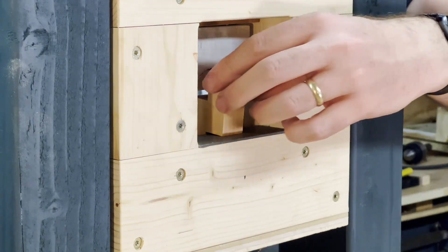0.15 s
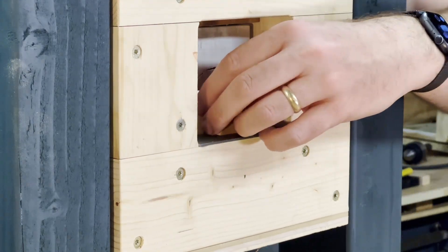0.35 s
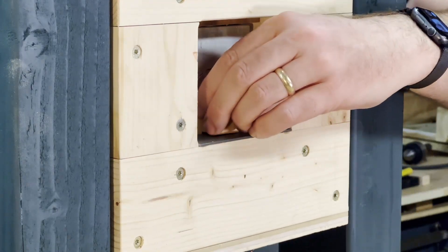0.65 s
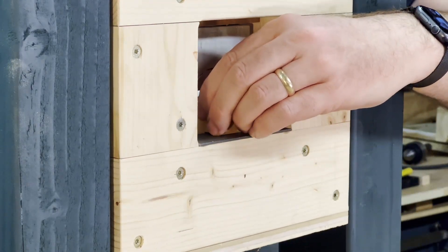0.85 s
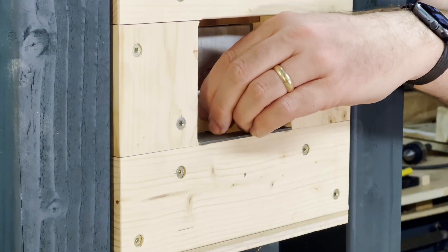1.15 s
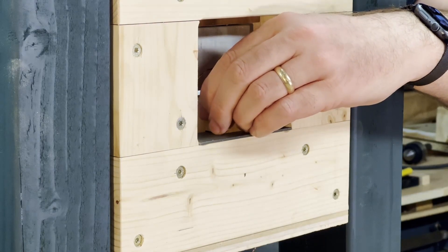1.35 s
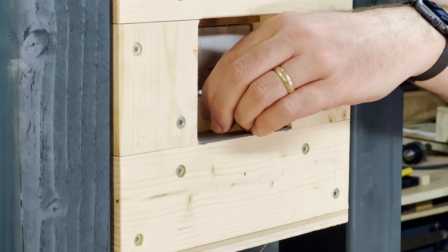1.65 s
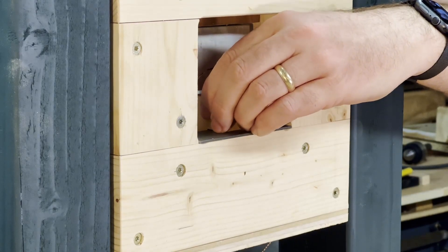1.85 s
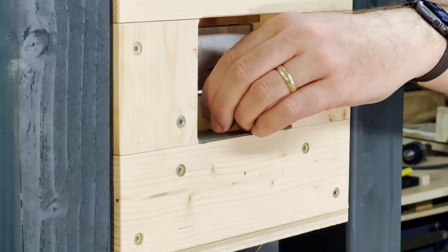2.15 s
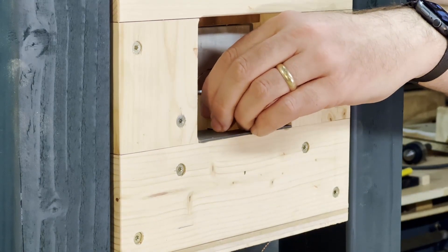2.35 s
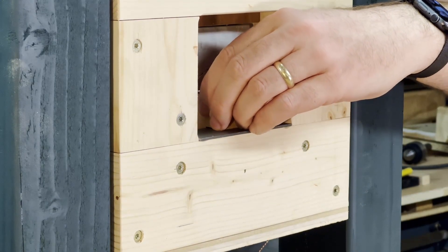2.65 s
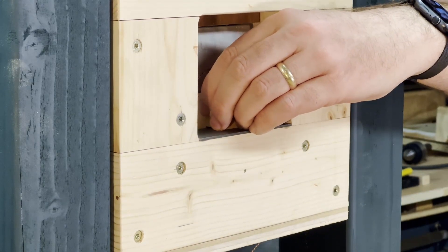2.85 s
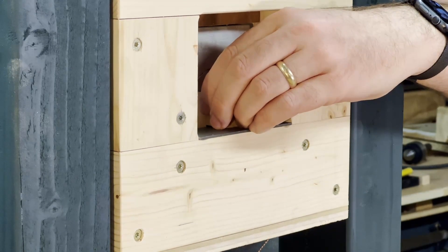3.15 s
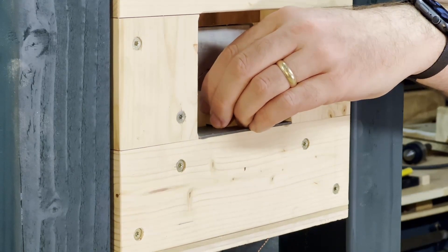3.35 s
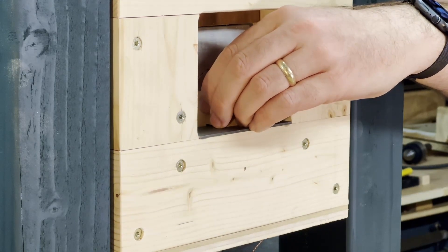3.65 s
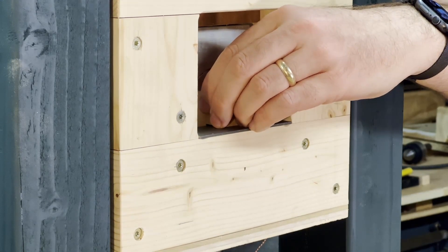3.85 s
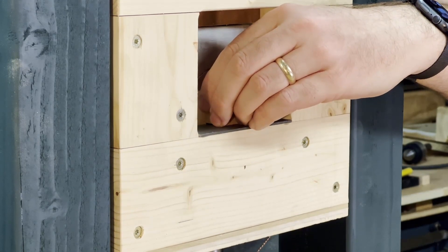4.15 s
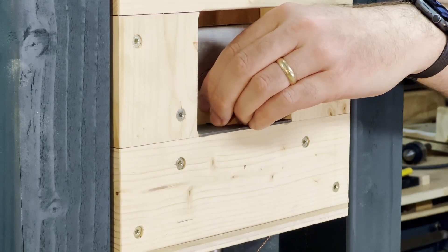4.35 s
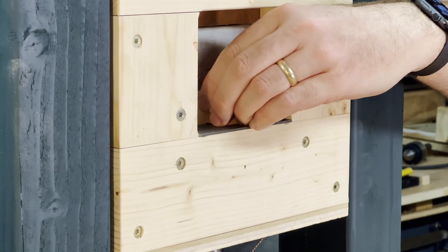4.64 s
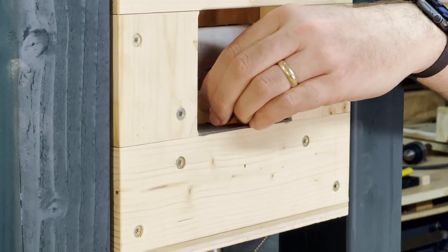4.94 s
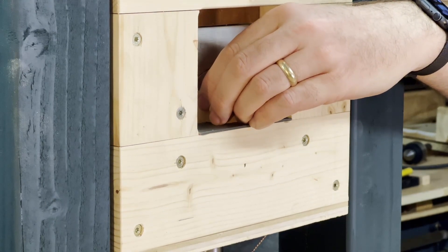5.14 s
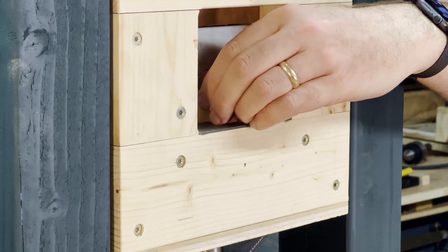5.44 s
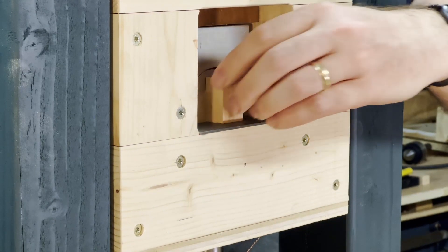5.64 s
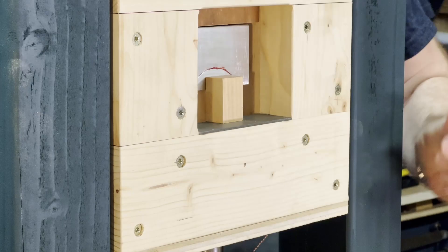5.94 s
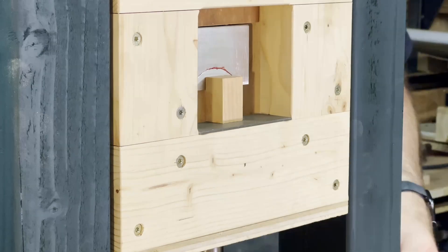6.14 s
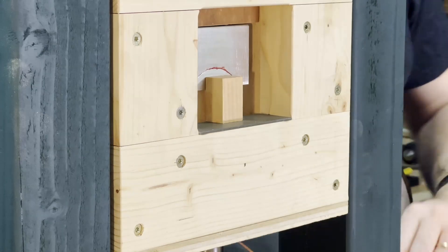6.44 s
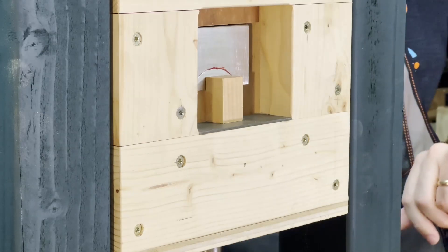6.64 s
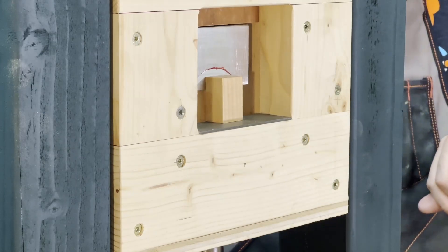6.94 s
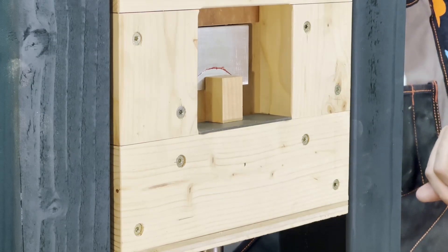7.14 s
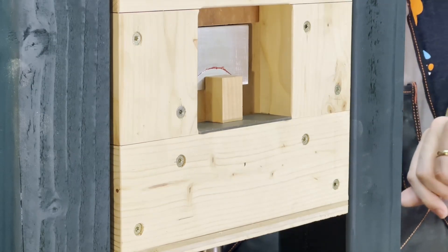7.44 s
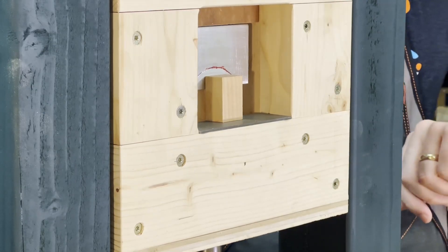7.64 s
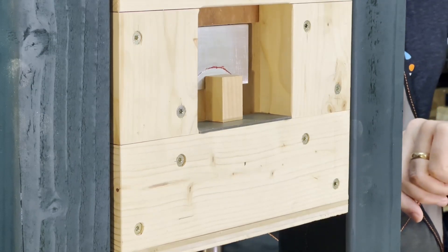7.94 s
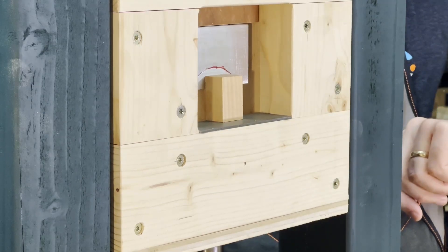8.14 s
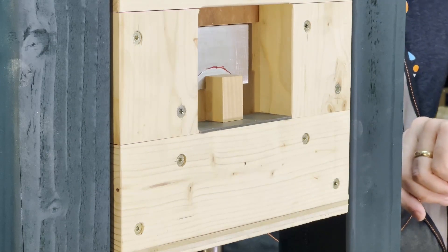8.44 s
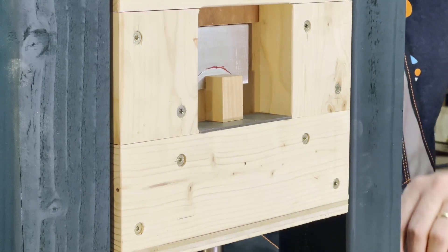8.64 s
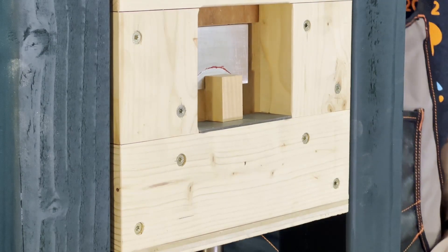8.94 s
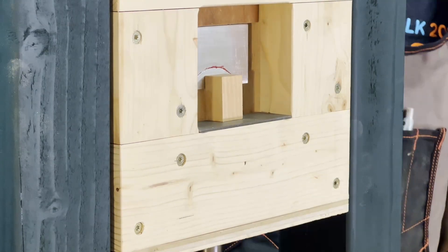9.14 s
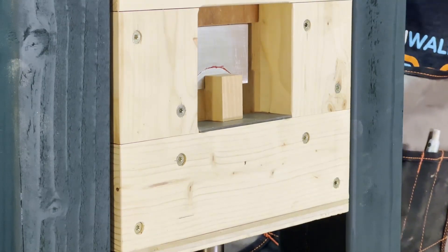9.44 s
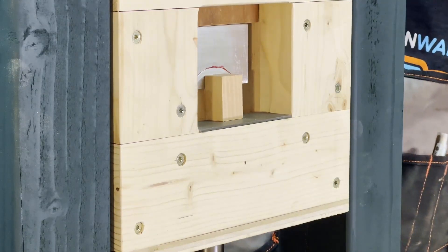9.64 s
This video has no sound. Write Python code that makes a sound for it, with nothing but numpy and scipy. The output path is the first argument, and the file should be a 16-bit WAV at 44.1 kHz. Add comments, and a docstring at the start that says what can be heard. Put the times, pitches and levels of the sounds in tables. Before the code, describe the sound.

A hand-pumped jack in a wooden frame clacks sharply in steady strokes, pauses with a cloth rustle and soft heavy thuds, then clacks once more.

```python
"""A hydraulic jack inside a wooden press frame is pumped by hand in a quiet workshop, heard by a stereo pair.
At each end of a stroke the loose steel linkage clacks and the frame knocks: chattering contacts ring decaying
modes and a broad crack, and the room answers with noise dying in two stages. Light taps fall mostly between.
In the pause cloth rustles (uneven swelling noise) and something heavy thuds (low decaying sines).
Below lies a low room rumble of coloured noise with faint wavering tones."""
import sys
import numpy as np
from scipy import signal
from scipy.fft import rfft, irfft
from scipy.io import wavfile
from scipy.ndimage import uniform_filter1d

SR = 44100
rng = np.random.default_rng(int(sys.argv[2]) if len(sys.argv) > 2 else 0)


def transcribe(signal):
    """Save signal, clipped to [-1, 1], as a 16-bit WAV file at the path in sys.argv[1]."""
    frames = np.atleast_2d(signal).T
    limited = np.clip(frames, -1, 1)
    pcm = np.round(limited * 32767).astype(np.int16)
    wavfile.write(sys.argv[1], SR, pcm)


N = 431738   # length in samples


def amp(db):
    """Level in dB to linear gain."""
    return 10 ** (np.asarray(db) / 20)


def rms_one(x):
    """Scale a signal to rms 1."""
    return x / np.sqrt(np.mean(x ** 2) + 1e-20)


def at_hz(points, hz):
    """Read a (f/Hz, value) table on a log-frequency axis."""
    table_hz, values = np.transpose(points)
    return np.interp(np.log(hz), np.log(table_hz), values)


def bin_hz(size):
    """Frequencies of the spectrum bins in Hz, kept at 1 or above for the logarithms."""
    return np.maximum(np.arange(size // 2 + 1) * SR / size, 1)


def drift(rate_hz):
    """Slow random wander of rms 1: noise through two equal low-pass poles, run at SR / 40."""
    step = 40
    pole = np.exp(-2 * np.pi * rate_hz * step / SR)
    settling = 2000
    noise = rng.standard_normal(N // step + settling + 2)
    slow = signal.lfilter([1], [1, -2 * pole, pole * pole], noise)[settling:]
    return np.interp(np.arange(N) / step, np.arange(len(slow)), rms_one(slow))


def shaped(size, gain_at, likeness):
    """Stereo noise coloured by a gain per frequency; a shared and an opposed part set left-right likeness."""
    hz = bin_hz(size)
    mid, side = rfft(rng.standard_normal((2, size)))
    alike = np.clip(at_hz(likeness, hz), 0, 1)
    pair = np.sqrt(1 + alike) * mid + np.sqrt(1 - alike) * side * [[1], [-1]]
    return irfft(gain_at(hz) * pair, size)


# room noise spectrum before overall scaling: (f/Hz, relative level/dB per Hz)
RUMBLE_COLOUR = [(15, -55.5), (25, -37.5), (48, -3.5), (111, -9.5), (185, -10.5), (293, -16.5),
                 (354, -20.5), (677, -33), (962, -37.5), (1130, -39.5), (14800, -56), (16000, -56.5)]
# how alike the room noise is at left and right: (f/Hz, likeness 0..1)
RUMBLE_LIKENESS = [(60, 0.97), (240, 0.9), (950, 0.55), (3770, 0.26), (15000, 0.4)]
# narrow tones in the room noise: (f/Hz, width at half amplitude/Hz, level before wavering/dB)
FAINT_TONES = [(182.2, 13.2, -64.5), (1450, 73, -86), (1440, 29, -86)]
RUMBLE_DB = -58   # before wavering


def rumble():
    """Distant bed of the place: coloured noise plus narrow noise bands, wavering in level together."""
    noise = shaped(N, lambda hz: amp(at_hz(RUMBLE_COLOUR, hz)), RUMBLE_LIKENESS)
    out = amp(RUMBLE_DB) * rms_one(noise)
    for tone_hz, width_hz, db in FAINT_TONES:
        tone = shaped(N, lambda hz: 1 / (1 + (2 * (hz - tone_hz) / width_hz) ** 2), RUMBLE_LIKENESS)
        out += amp(db) * rms_one(tone)
    return out * amp(2.1 * drift(3))


# cloth and hands moving: (peak t/s, peak level before unevenness/dB, swell for 20 dB/s, fade for 20 dB/s)
RUSTLES = [(0, -61, .01, .45), (0.4, -71, .5, .5), (1.3, -74, 1.0, 1.5), (2.5, -60, .2, .13),
           (6.05, -70, .5, .3), (6.2, -58, .02, .15), (6.28, -54, .12, .09), (6.4, -67, .2, .08),
           (6.62, -72, .3, .6), (7.1, -54.5, .03, .07), (7.175, -44.5, .02, .1), (8.44, -74, .1, .25),
           (9.05, -64.5, .35, .3), (9.45, -74, .4, .4)]
# friction noise spectrum before overall scaling: (f/Hz, relative level/dB per Hz)
RUSTLE_COLOUR = [(200, -23), (500, 3.5), (1000, 0), (2500, -2), (5000, -14.5), (9000, -18), (15000, -47)]
# how alike rustle and reflections are at left and right: (f/Hz, likeness 0..1)
ROOM_LIKENESS = [(200, 0.99), (1000, .7), (2500, 0.83), (8000, 0.92)]
RUSTLE_REST_DB = -82   # steady friction noise under the movements, before unevenness


def rustle():
    """Cloth and hands: friction noise, uneven from moment to moment, swelling and fading with each movement."""
    t = np.arange(N) / SR
    level = amp(RUSTLE_REST_DB)
    for peak_s, db, swell_s, fade_s in RUSTLES:
        away = np.maximum((peak_s - t) / swell_s, (t - peak_s) / fade_s)
        level = level + amp(db - 20 * away)
    noise = rms_one(shaped(N, lambda hz: amp(at_hz(RUSTLE_COLOUR, hz)), ROOM_LIKENESS))
    return level * amp(2.2 * drift(60)) * noise


# dull thuds: (onset t/s, starting level of the decay/dB, f/Hz, t60/s)
THUDS = [(6.279, -33, 139.8, 0.1), (7.049, -40.5, 46, .4), (7.165, -32, 126, 0.14),
         (7.196, -29.5, 45.2, 0.4), (7.298, -34.5, 50.1, 0.57), (7.356, -39, 78, 0.21),
         (7.508, -39.5, 47.4, 0.6)]


def thuds():
    """Soft heavy contacts: one low decaying mode each, swelling over about a cycle."""
    out, t = np.zeros(N + SR), np.arange(SR) / SR
    for onset_s, db, hz, t60 in THUDS:
        decay = amp(db - 60 * t / t60)
        swell = 1 - np.exp(-2 * t * hz)
        at = round(onset_s * SR)
        out[at:at + SR] += decay * swell * np.sin(2 * np.pi * hz * t)
    return out[:N]


# decay of the workshop's reflections, first stage: (f/Hz, t60/s)
ROOM_T60 = [(200, 0.64), (600, 0.26), (1500, 0.24), (4000, 0.18), (10000, 0.13)]
ROOM_DB = -6.5   # energy of the whole tail per channel, against the direct path
LATE_DB, LATE_STRETCH = -22.5, 2.22   # second stage against the first: its start, and times slower


def workshop(x):
    """Reflections: noise building over a few ms and dying in two stages, at its own rate per half octave."""
    t, tail = np.arange(SR) / SR, 0
    for centre_hz in 100 * 2 ** np.arange(0, 7.6, .5):
        band = shaped(len(t), lambda hz: np.exp(-6 * np.log2(hz / centre_hz) ** 2), ROOM_LIKENESS)
        decay_db = -60 * t / at_hz(ROOM_T60, centre_hz)
        tail = tail + band * (amp(decay_db) + amp(LATE_DB + decay_db / LATE_STRETCH))
    tail *= 1 - np.exp(-t / 0.0074)
    tail *= amp(ROOM_DB) / np.sqrt(np.sum(tail ** 2) / 2)
    return signal.fftconvolve(x[None], tail, axes=1)[:, :N]


def blows(events, modes, spread_db, crack_db, crack_hz, octaves):
    """Each contact is a short swelling chatter that rings every mode with a new strength, plus a broad crack."""
    size = 2 ** 14
    out, t = np.zeros(N + size), np.arange(size // 2) / SR
    touch_t = t[:size // 4]
    hz, mode_db, t60 = np.transpose(modes)
    rings = np.sin(2 * np.pi * np.outer(hz, t)) * amp(-60 * t / t60[:, None])
    crack_band = signal.butter(3, crack_hz, "band", fs=SR, output="sos")
    crack = amp(crack_db) * signal.sosfilt(crack_band, t == 0)
    spectrum_hz = bin_hz(size)
    for s, level_db, favoured_hz, emphasis_db, length_s in events:
        mode_chance = rng.standard_normal(len(modes))
        body = amp(mode_db + spread_db * mode_chance) @ rings + crack
        grains = rng.standard_normal(size // 4) ** 3   # a few hard touches among many faint ones
        phase = touch_t / max(length_s, 2e-4)
        settling = amp(-30) * (1 - np.exp(-phase)) * np.exp(-touch_t / .015)   # loose parts settle afterwards
        chatter = grains * (phase ** 2 * np.exp(-2 * phase) + settling)
        # where the part is touched decides which region of its spectrum speaks
        distance = np.log2(spectrum_hz / favoured_hz)
        # a weaker contact is softer and loses the treble above that region
        dulling_db = 0.28 * min(level_db + 19.5, 0) * np.maximum(distance, 0)
        colour = amp(emphasis_db * np.exp(-(distance / octaves) ** 2) + dulling_db)
        lead = 64   # samples of room for the colouring, which starts a little early
        sound = np.roll(irfft(rfft(chatter, size) * rfft(body, size) * colour), lead)
        loudest = np.sqrt(uniform_filter1d(sound ** 2, size=200).max())   # rms over 4.5 ms
        at = round(s * SR) - lead
        out[at:at + size] += amp(level_db) * sound / loudest
    return out[:N]


# event levels below are for the loudest 4.5 ms, before the trim of the frame or linkage as a whole
# lever pushed down: (tick t/s, level/dB, catch t/s, level/dB, stop t/s, level/dB, knock t/s, level/dB,
#                     f the tick favours/Hz, f the knock favours/Hz)
PUSHES = [(0.4698, -42, 0.496, -24, 0.5017, -14, 0.503, -28.5, 2210, 1000),
          (1.0781, -31, 1.0935, -29.5, 1.1015, -9, 1.11, -23, 3880, 990),
          (1.942, -37, 1.9536, -29, 1.9601, -18.5, 1.962, -31, 2870, 700),
          (2.6165, -25, 2.643, -19, 2.6464, -10, 2.647, -24, 3960, 1000),
          (3.3925, -33, 3.4173, -23, 3.4289, -13.5, 3.435, -29, 3910, 800),
          (4.375, -38, 4.3795, -23, 4.3945, -14, 4.402, -32, 2500, 700),
          (5.3847, -48, 5.407, -23, 5.4155, -15.5, 5.424, -22.5, 2950, 1000),
          (8.1064, -24.5, 8.131, -20, 8.146, -23, 8.15, -27, 3970, 990)]
# lever lifted: columns as for the pushes (t/s, level/dB four times, then two f/Hz)
LIFTS = [(0.044, -36, 0.0496, -31, 0.0763, -31, 0.083, -28, 3000, 900),
         (0.7975, -36, 0.806, -27, 0.8268, -27, 0.833, -30.5, 2540, 950),
         (1.405, -33.5, 1.4189, -26, 1.449, -30, 1.454, -28.5, 2700, 980),
         (2.251, -37, 2.2633, -24, 2.2797, -21.5, 2.283, -29.5, 3010, 500),
         (2.9827, -40, 3.005, -25, 3.0328, -25.5, 3.033, -28, 2210, 580),
         (3.778, -42, 3.812, -28, 3.843, -37, 3.844, -31, 2530, 560),
         (4.7167, -40, 4.744, -28, 4.7723, -32, 4.782, -26, 2210, 650),
         (5.706, -48, 5.766, -29, 5.7914, -28, 5.796, -26, 2570, 970),
         (8.586, -43, 8.624, -29, 8.652, -36, 8.653, -29.5, 3310, 700)]
# light taps on the frame as the load shifts, mostly between strokes:
# (t just before the peak/s, level/dB, f the contact favours/Hz)
TAPS = [(0.227, -44.5, 700), (0.334, -45, 1490), (0.35, -40, 1450), (0.96, -47.5, 710), (1.043, -38.5, 920),
        (1.301, -54, 880), (1.381, -39, 910), (1.851, -43.5, 905), (1.924, -42, 6000), (1.964, -31, 3060),
        (2.15, -45, 2200), (2.243, -40, 5700), (2.479, -31, 760), (2.839, -48, 3080), (2.961, -40, 910),
        (3.148, -36, 6900), (3.165, -38, 8900), (3.292, -42.5, 710), (3.449, -12, 8400), (3.607, -51, 1800),
        (4.093, -38, 932), (4.125, -45, 850), (4.399, -29, 2320), (4.413, -30.5, 1270), (4.54, -44.5, 2240),
        (5.398, -37.5, 1980), (5.732, -41, 980), (6.225, -50, 1000), (7.001, -37, 973), (7.033, -51, 936),
        (7.344, -31, 961), (7.928, -35, 1040), (8.163, -27, 2300), (8.6, -42, 1500), (8.668, -32.5, 990),
        (9.457, -62, 1530)]
# wooden frame modes: (f/Hz, mean relative level/dB, t60/s)
FRAME_MODES = [(112, -15, 0.3), (241, -2, .1), (394, -2.5, 0.08), (478.6, -1.5, 0.068), (530.2, 3, 0.061),
               (660, 6, 0.021), (805.5, 0.5, 0.018), (990, 12.5, 0.021), (1361, -6, 0.039),
               (1506, -16.5, .025)]
KNOCK = (5.5, 0.0064)   # emphasis dB, chatter length s
WOOD_TAP = (8, .0045)   # emphasis dB, chatter length s
KNOCK_LEAD_S = .003   # wood contacts start this much before their listed time
PUSH_TICK_IN_FRAME_DB, LIFT_TICK_IN_FRAME_DB = -9, -2.5   # the tick also sounds in the wood
TICK_IN_FRAME_HZ, WOOD_TOP_HZ = 2250, 4500   # taps pitched at the top or above sound in the steel alone


def wooden_frame():
    """Wood around the jack: knocks, ticks and taps ring short modes and a mid-range crack."""
    events = [(s - KNOCK_LEAD_S, db, hz, *WOOD_TAP) for s, db, hz in TAPS if hz < WOOD_TOP_HZ]
    for strokes, tick_db in (PUSHES, PUSH_TICK_IN_FRAME_DB), (LIFTS, LIFT_TICK_IN_FRAME_DB):
        for row in strokes:
            tick, _, _, knock, (_, knock_hz) = np.reshape(row, (-1, 2))
            events.append((tick[0] - KNOCK_LEAD_S, tick[1] + tick_db, TICK_IN_FRAME_HZ, *KNOCK))
            events.append((knock[0] - KNOCK_LEAD_S, knock[1], knock_hz, *KNOCK))
    ringing = blows(events, FRAME_MODES, spread_db=3, crack_db=48.5, crack_hz=[300, 2200], octaves=.5)
    return amp(-1.5) * ringing


# steel linkage modes: (f/Hz, mean relative level/dB, t60/s)
STEEL_MODES = [(2610, -9.5, 0.03104), (3402, -10.5, 0.013), (3710, -10, 0.013), (4191, -9.5, 0.079),
               (5500, -21, 0.017), (6630, -15, 0.19), (6990, -15.5, .1), (7200, -9.5, .05),
               (8188, -5, 0.035), (8540, -1, .045), (8340, 0, 0.05), (9626, -2, 0.021), (12460, -6.5, .04),
               (14800, -15, 0.033)]
# catch, then stop, of a push: (f the contact favours/Hz, emphasis level/dB, chatter length t/s)
PUSH_CONTACTS = [(8100, 11, .0025), (8370, 8, .0027)]
# catch, then stop, of a lift: (f the contact favours/Hz, emphasis level/dB, chatter length t/s)
LIFT_CONTACTS = [(9000, 5, .006), (3100, 5, .0025)]
LOOSE = (16, .0025)   # ticks, jolts and rattle: emphasis dB, chatter length s
JOLT_DB, JOLT_LOWEST_HZ, JOLT_LEAD_S = -13, 2800, .005   # a tap is led by a jolt in the linkage
# loose touches from tick to just past the knock, under the level that climbs from tick to catch
RATTLE_DB, RATTLE_SPREAD_DB, RATTLE_ON_S, RATTLE_HZ = -10.5, 3, .02, 3300


def rattle(tick, catch, knock):
    """Eight loose touches at random times, each favouring a pitch within an octave of the centre."""
    touches = []
    for when, strength, place in rng.random(size=(8, 3)):
        s = tick[0] + when * (knock[0] + RATTLE_ON_S - tick[0])
        climb_db = tick[1] + when * (catch[1] - tick[1])
        db = climb_db + RATTLE_DB + RATTLE_SPREAD_DB * (2 * strength - 1)
        touches.append((s, db, RATTLE_HZ * 2 ** (2 * place - 1), *LOOSE))
    return touches


def steel_linkage():
    """Jack linkage: tick, catch, stop and rattle of each stroke ring bright modes and a broad crack."""
    events = [(s - JOLT_LEAD_S, db + JOLT_DB, max(hz, JOLT_LOWEST_HZ), *LOOSE) for s, db, hz in TAPS]
    for strokes, (catch_kind, stop_kind) in (PUSHES, PUSH_CONTACTS), (LIFTS, LIFT_CONTACTS):
        for row in strokes:
            tick, catch, stop, knock, (tick_hz, _) = np.reshape(row, (-1, 2))
            events += [(*tick, tick_hz, *LOOSE), (*catch, *catch_kind), (*stop, *stop_kind)]
            events += rattle(tick, catch, knock)
    ringing = blows(events, STEEL_MODES, spread_db=3, crack_db=33, crack_hz=[1800, 16000], octaves=0.34)
    return amp(-6) * ringing


def scene():
    """Jack and frame sound directly and through the room's reflections; the rest is added around them."""
    jack = wooden_frame() + steel_linkage()
    return rumble() + rustle() + thuds() + workshop(jack) + jack


# level lean of the microphone pair: (f/Hz, left minus right level/dB)
LEAN = [(60, -.5), (200, -1.5), (500, -1), (1100, -5.5), (1900, -2), (15000, 1)]
# phase lean of the microphone pair: (f/Hz, phase by which left leads/rad)
PORT_PHASE = [(1000, 0), (1550, 1.5), (2500, 0.78), (6700, -0.93), (8000, 5.5), (9200, 5.5), (10200, 3.5),
              (12000, 2.5), (13900, 0)]
# treble dips of both microphones: (centre f/Hz, full width where the dip is down to 1/e of its dB/Hz, level/dB)
MIC_DIPS = [(7685, 67, -10), (11466, 1000, -38.5)]
CUTOFF_HZ = 16600   # from here up the level is at least 70 dB down


def record(dry):
    """The microphone pair leans and shifts phase by frequency and has two treble dips; the top is cut."""
    hz = bin_hz(N)
    side = np.array([[.5], [-.5]])   # half of each difference goes to left, half to right
    dips_db = sum(db * np.exp(-(2 * (hz - dip_hz) / width_hz) ** 2) for dip_hz, width_hz, db in MIC_DIPS)
    gain = amp(dips_db + side * at_hz(LEAN, hz))
    phase_shift = np.exp(1j * side * at_hz(PORT_PHASE, hz))
    wet = irfft(rfft(dry) * gain * phase_shift, N)
    return signal.sosfilt(signal.cheby2(12, 70, CUTOFF_HZ, fs=SR, output="sos"), wet)


dry = scene()
out = record(dry)
transcribe(out)
```